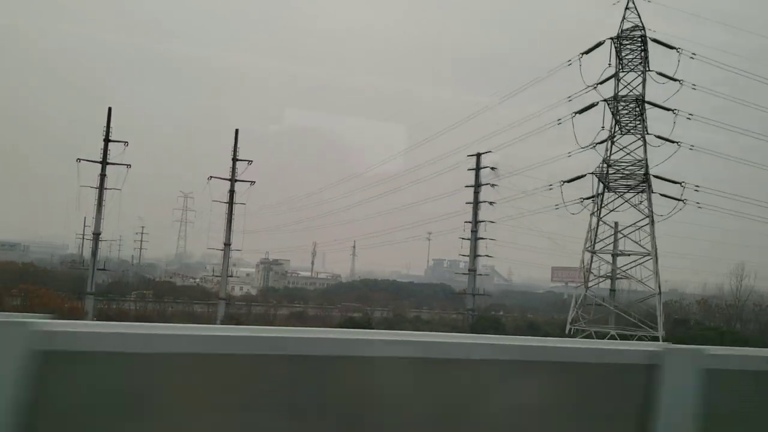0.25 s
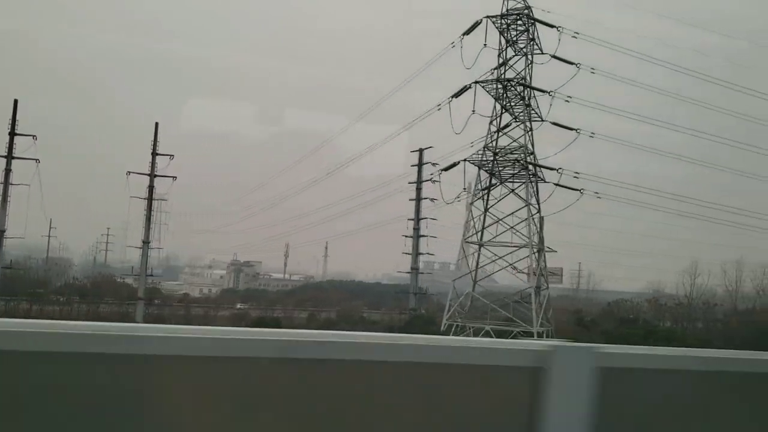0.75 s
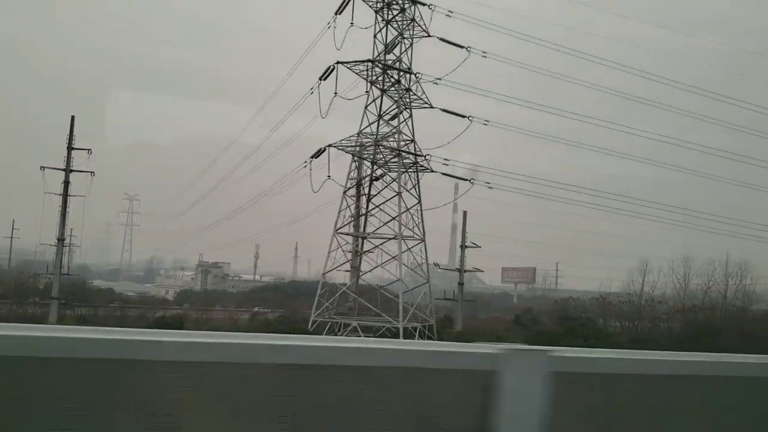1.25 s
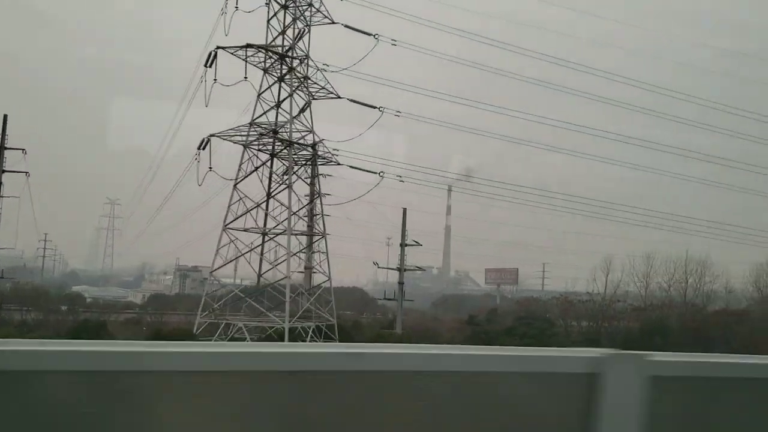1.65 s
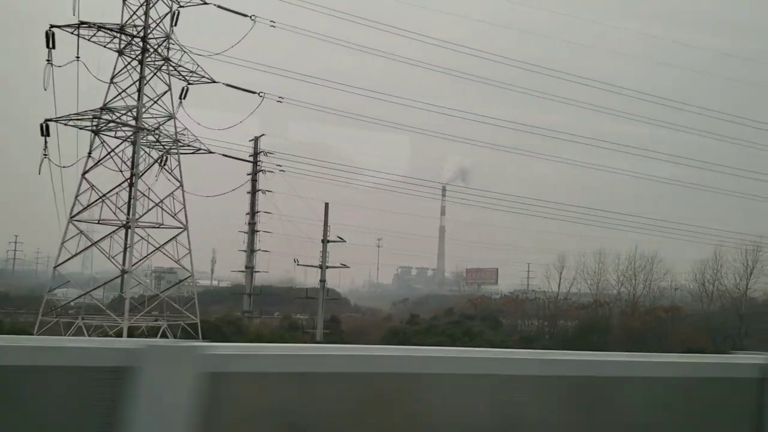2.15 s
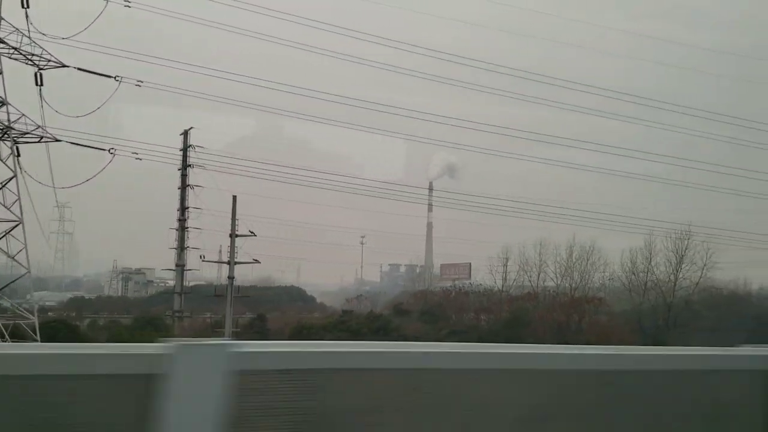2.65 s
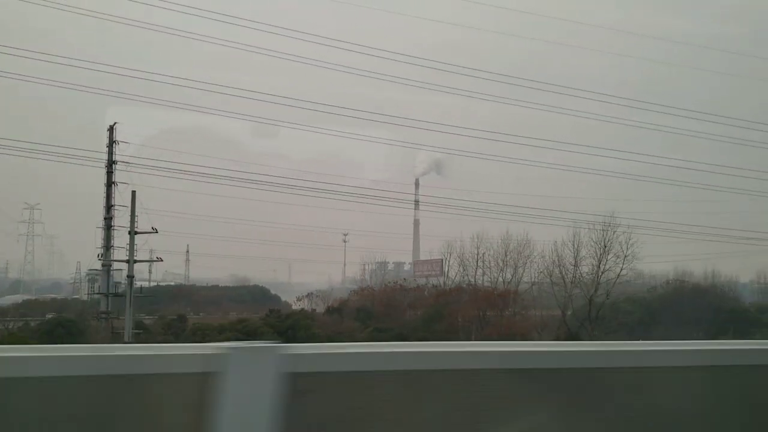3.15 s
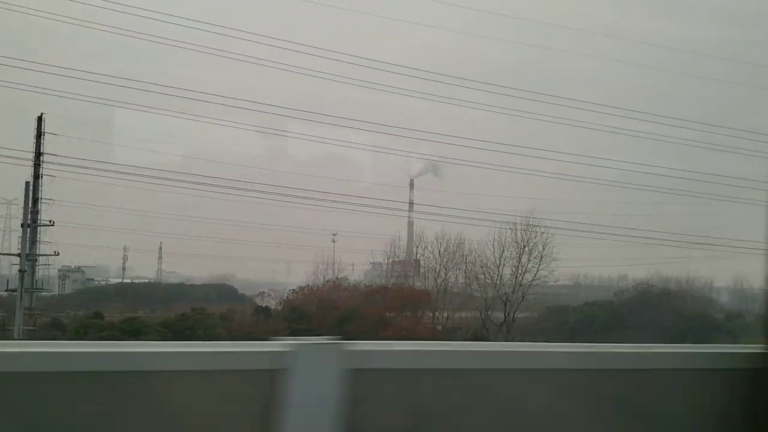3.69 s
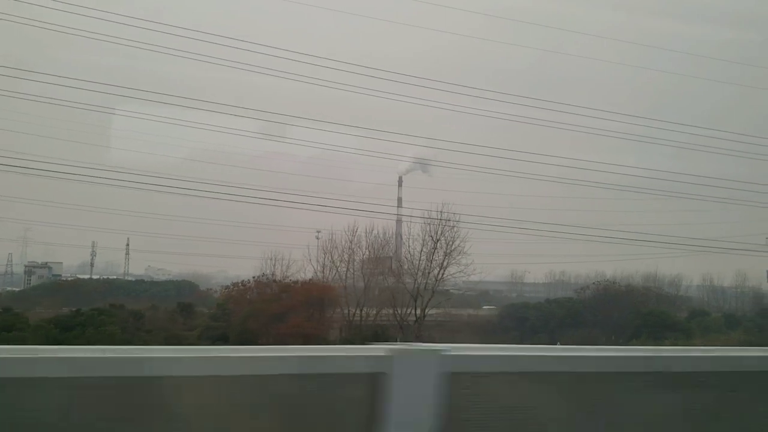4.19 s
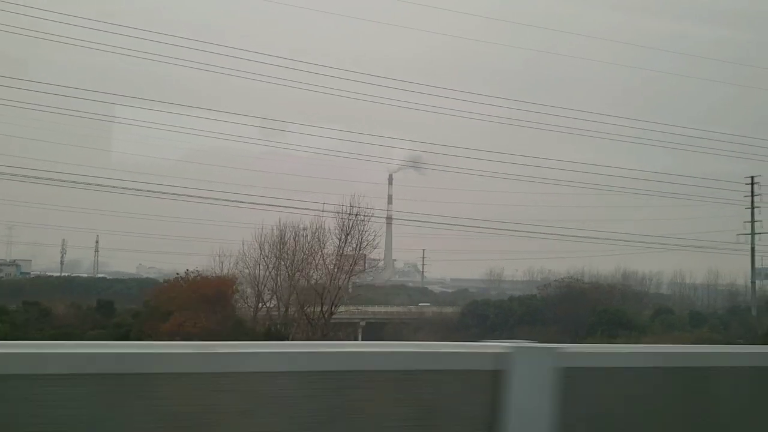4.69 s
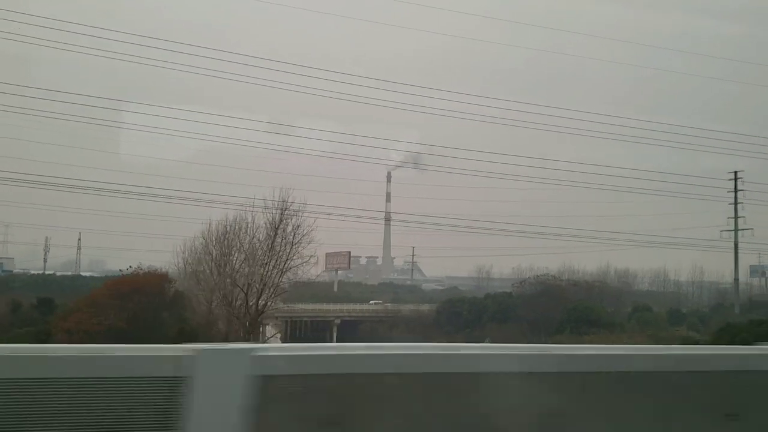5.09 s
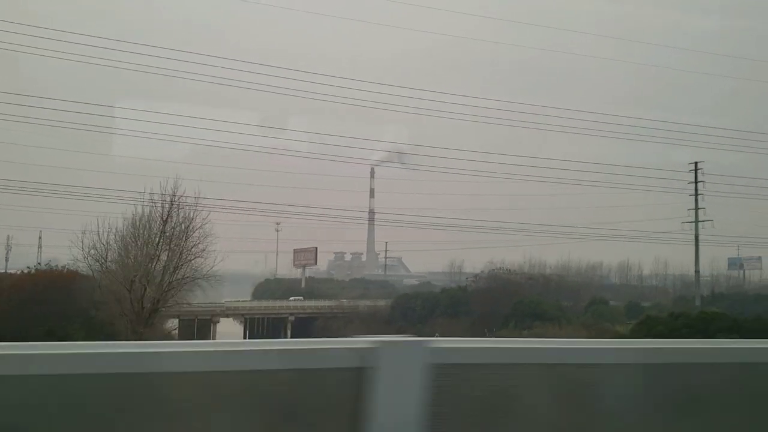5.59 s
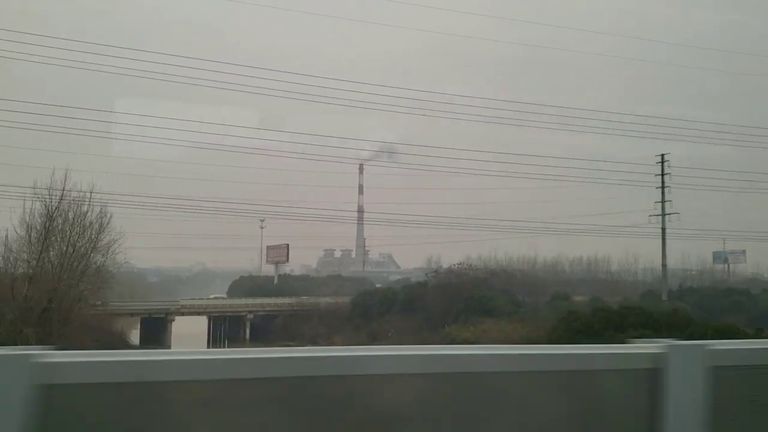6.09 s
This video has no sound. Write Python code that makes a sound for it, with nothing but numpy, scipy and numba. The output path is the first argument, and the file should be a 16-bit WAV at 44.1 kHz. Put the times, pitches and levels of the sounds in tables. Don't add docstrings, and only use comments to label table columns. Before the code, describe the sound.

Low rolling train rumble throbs unevenly under close fabric rustling, busiest around the middle, with a single dull thump on the window ledge.

```python
import sys
import numpy as np
from scipy import signal
from scipy.fft import rfft, irfft
from scipy.io import wavfile
from scipy.ndimage import uniform_filter1d
from numba import njit

SR = 44100
rng = np.random.default_rng(int(sys.argv[2]) if len(sys.argv) > 2 else 0)


def persist_wave(psi):
    counts = np.round(np.clip(psi, -1, 1) * 32767).astype(np.int16)
    wavfile.write(sys.argv[1], SR, np.atleast_2d(counts).T)


def field_ratio(decibels):
    return 10 ** (np.asarray(decibels, dtype=float) / 20)


N = 279594
T = np.arange(N) / SR

# start in seconds, peak level in dB, centre in Hz,
# bright part in dB.
SNAPS = [(0.855, -44, 6030, -16), (1.134, -43, 1710, -23), (1.4062, -41.5, 9000, -6),
         (2.4813, -40, 1520, -10), (2.5222, -42, 4610, -23), (2.5808, -26.5, 7300, -18),
         (2.7113, -37.5, 2080, -3), (2.765, -28.5, 5140, -5), (2.815, -33.5, 1770, -2),
         (2.855, -32.5, 7220, 1), (2.9143, -29, 4540, -3), (2.949, -44, 1980, -25), (3.018, -33.5, 2920, 3),
         (3.0616, -40, 3270, -17), (3.083, -37, 3310, -16), (3.25, -37, 2170, -7),
         (3.2798, -26.5, 3000, -17), (3.316, -24, 6760, -7), (3.359, -28, 4000, -2),
         (4.063, -37, 3400, -30), (3.915, -33, 3300, -40), (4.2926, -27.5, 4570, -3),
         (6.102, -40.5, 1900, -17), (4.58, -31, 6700, 3), (4.968, -41, 1520, -11), (4.9907, -34, 3500, -2),
         (5.4864, -37, 2000, -32), (5.8775, -38, 2400, -12), (5.992, -61, 5030, -20),
         (6.229, -56, 4000, -23)]
# start in seconds, peak level in dB, centre in Hz,
# bright part in dB, time to die away in seconds.
FOLDS = [(.07, -44, 3500, -8, 0.22), (.191, -38, 6540, -10, 0.27), (0.504, -33.5, 2800, -8.5, 0.32),
         (.8769, -40.5, 1920, -29, .14), (1.184, -31.5, 4500, -8, 0.15), (1.4433, -35.5, 7700, 0, 0.27),
         (2.199, -40, 2550, -30, .15), (2.498, -42, 5500, -9, .1), (3.1292, -32, 3340, -4, 0.18),
         (3.184, -26.5, 3300, -8, 0.084), (3.4412, -28, 2340, -9, 0.058), (3.5034, -29.5, 4430, -3, 0.11),
         (3.6147, -28.5, 7400, -3, 0.47), (3.868, -30, 5360, -2, 0.19), (3.9856, -31, 7830, -8, 0.17),
         (4.052, -27, 3050, -8, 0.094), (4.14, -30, 6100, 2, 0.13), (4.2178, -36, 2960, -12, 0.12),
         (4.354, -28.5, 2030, -18, 0.24), (4.4346, -31.5, 4200, -6, 0.12), (4.4712, -32, 1860, -8, .13),
         (4.621, -35.5, 3250, 0, 0.28), (5.598, -33.5, 6500, -11, 0.12), (5.7736, -40, 1530, -28, 0.22)]


def unit(x):
    return x / np.sqrt(np.mean(x ** 2))


def on_log(table, hz):
    f, v = np.transpose(table)
    return np.interp(np.log(np.maximum(hz, 1)), np.log(f), v)


def colour(x, table):
    hz = np.fft.rfftfreq(N, 1 / SR)
    return irfft(rfft(x) * field_ratio(on_log(table, hz)), N)


def walk(rate):
    hold = int(SR / rate)
    steps = np.repeat(rng.standard_normal(N // hold + 1), hold)
    drift = uniform_filter1d(uniform_filter1d(steps, hold), hold)[:N]
    return drift / drift.std()


def pan(db):
    return field_ratio(np.array([[db / 2], [-db / 2]]))


def car_body():
    # frequency in Hz, level in dB per Hz.
    body = [(24, -38), (32, -42), (44, -6), (58, 0.5), (70, -0.5), (88, -7), (114, 5.5), (132, -3.5),
            (155, -11), (220, -20.5), (361, -26), (600, -29.5), (726, -38.5), (900, -37)]
    # frequency in Hz, level in dB per Hz.
    rail = [(900, -37.5), (1030, -34.5), (1130, -38.5), (1250, -44.5), (1800, -47.5), (2700, -52),
            (3300, -65), (4000, -66)]
    # frequency in Hz, likeness from 0 to 1.
    likeness = [(60, 0.94), (130, 1), (290, 0.89), (640, 0.16), (1410, 0.2), (3100, 0.03), (6820, -0.0),
                (15000, 0.0)]
    # frequency in Hz, left minus right in dB.
    lean = [(40, 2), (120, 1.5), (300, 2.5), (700, 1.5), (1500, -0.5), (3000, 1)]
    bass_lag_s = 0.00023

    hz = np.fft.rfftfreq(N, 1 / SR)
    like = np.clip(on_log(likeness, hz), 0, 1)
    mid, side = rfft(rng.standard_normal((2, N)))
    shared, apart = np.sqrt(1 + like) * mid, np.sqrt(1 - like) * side
    both = np.array([shared + apart, shared - apart])
    tone_db = on_log(body[:-1] + rail, hz)
    both = both * field_ratio(tone_db + np.outer([.5, -.5], on_log(lean, hz)))
    both[0] *= np.exp(-2j * np.pi * hz * bass_lag_s)

    edges = (0, 88, 160, 700, 1250, 5000)
    steadiness = (0.66, 0.91, 0.12, 0.072, 0.039)
    out = 0
    for lo, hi, gain, even in zip(edges, edges[1:], shell_levels(), steadiness):
        band = irfft(both * (hz >= lo) * (hz < hi), N)
        swell = np.sqrt(uniform_filter1d(band.mean(0) ** 2, int(.07 * SR)) + 1e-12)
        band = band / swell ** even
        out = out + band / band.mean(0).std() * gain
    return out


def shell_levels():
    # middle in seconds, length in seconds, low boom in dB, floor boom in dB.
    jolts = [(0.035, 0.031, -29, -27.5), (0.138, 0.052, -32, -26), (0.235, 0.075, -27, -38),
             (0.361, 0.063, -24.5, -34), (0.54, 0.075, -24.5, -29.5), (0.707, 0.15, -28.5, -31.5),
             (0.946, 0.089, -27, -33.5), (1.11, 0.13, -32, -31.5), (1.275, 0.056, -28.5, -47),
             (1.463, 0.071, -44, -26.5), (1.598, 0.097, -30, -32), (1.754, 0.083, -44, -28.5),
             (1.998, 0.15, -30, -34), (2.233, 0.075, -37, -27), (2.414, 0.23, -32.5, -47),
             (2.627, 0.057, -37, -26), (2.81, 0.13, -38.5, -27.5), (2.957, 0.036, -23, -28),
             (3.057, 0.037, -28.5, -32), (3.27, 0.077, -22, -26.5), (3.443, .1, -44, -28.5),
             (3.686, 0.15, -32, -34), (3.83, 0.051, -29, -30.5), (4.133, 0.11, -26.5, -30),
             (4.596, 0.16, -34, -33), (4.92, 0.11, -36.5, -31), (5.21, 0.13, -28.5, -28),
             (5.447, 0.23, -31, -32), (5.716, 0.28, -30.5, -31), (6.23, .07, -27.5, -34.5)]
    # time in seconds, level in dB.
    rail_song = [(0, -58.5), (.41, -55.5), (1.02, -58), (2.0, -56.5), (3.1, -55), (3.4, -48), (3.6, -53),
                 (4.4, -54), (5.3, -58), (5.8, -55.5), (6.34, -56)]
    s, length, low_db, floor_db = np.array(jolts).T[:, :, None]
    swell = np.exp(-(2 * (T - s) / length) ** 2 / 2)

    def boom(calm_db, jolt_db):
        return np.sqrt(field_ratio(calm_db) ** 2 + (field_ratio(jolt_db) ** 2 * swell).sum(0))

    panels = field_ratio(-40.5 - 0.2255 * T)
    rail = field_ratio(np.interp(T, *np.transpose(rail_song)))
    vents = field_ratio(-63)
    return [boom(-38.5, low_db), boom(-35, floor_db), panels, rail, vents]


def tones():
    # frequency at 0 s in Hz, end in seconds, first level in dB,
    # last level in dB, left minus right in dB.
    geared = [
        (1045.3, 3.85, -63, -56, 0),
        (522.6, 2.4, -63, -59, 0),
        (360.5, 3.4, -55, -60, 3),
        (783, .85, -64, -67, 0),
    ]
    # frequency in Hz, start in seconds, level in dB, wobble in dB,
    # left minus right in dB.
    held = [
        (36.4, -1, -39.5, 1.2, 3),
        (59.8, -1, -35.5, 2.5, 5),
        (941.8, -1, -62, .8, 0),
        (920.5, 3.97, -59.5, .6, 0),
    ]
    speed = 1 - .01235 * T
    out = 0
    for hz, end, first_db, last_db, pan_db in geared:
        db = first_db + (last_db - first_db) * T / end
        out = out + line(hz * speed, db, end - T, 1.2, pan_db)
    for hz, start, db, wobble_db, pan_db in held:
        out = out + line(hz, db, T - start, wobble_db, pan_db)
    return out


def line(hz, db, on, wobble_db, pan_db):
    gain = np.clip(on / 0.031 + 1, 0, 1) * field_ratio(db + wobble_db * walk(6))
    wavering_hz = hz * (1 + 0.00052 * walk(3.99))
    sine = np.sqrt(2) * np.sin(2 * np.pi * np.cumsum(wavering_hz) / SR)
    return pan(pan_db) * gain * sine


def cloth():
    # time in seconds, effort in dB, fineness of the weave in dB.
    sliding = [(0, -76, -13), (.1, -59.5, 1), (.45, -71.5, 6), (.75, -67.5, 0.5), (1.06, -62, 3),
               (1.3, -67.5, 1.5), (1.8, -61.5, -2.5), (2.15, -61.5, 0.5), (2.4, -57, 0), (2.85, -51, 0),
               (3.02, -55, -1), (3.4, -43, 0), (3.75, -54.5, -2), (4.2, -54, -3), (4.6, -56, 0),
               (5.2, -60, -3.5), (5.85, -56.5, -1.5), (6.34, -59.5, -9)]
    s, effort_db, fine_db = np.transpose(sliding)
    effort = field_ratio(np.interp(T, s, effort_db)) ** 2
    slide_db = 10 * np.log10(effort + stir(0))
    sheen_db = 10 * np.log10(effort + stir(0.47))
    dull_db = slide_db + 0.25 * (slide_db + 47) + 5.0
    bright_db = sheen_db + 4.0
    noise = rfft(rng.standard_normal((2, N)))
    third = 3 * np.log2(np.fft.rfftfreq(N, 1 / SR) / 1000 + 1e-9)
    out = 0
    for k in range(14):
        bright = np.clip((k - 7) / 2, 0, 1)
        db = dull_db + bright * (bright_db - dull_db)
        db = db + max(k - 6, 0) / 4 * np.interp(T, s, fine_db)
        db = db + 1.4 * walk(12) + 1.1 * walk(35)
        patch = irfft(noise * np.clip(1 - abs(third - k), 0, 1), N)
        out = out + patch * field_ratio(db)
    return out * grain(200, 2.0)


def stir(bright_share):
    s, db, _, bright_db = np.array([r[:4] for r in SNAPS + FOLDS]).T[:, :, None]
    is_snap = (np.arange(len(s)) < len(SNAPS))[:, None]
    db = db + 0.5 * is_snap - 21.5
    late = T - s - 0.0055
    swell = np.exp(-(late / np.where(late < 0, 0.007, 0.017)) ** 2 / 2)
    return (field_ratio(db + bright_share * (bright_db + 5.5)) ** 2 * swell).sum(0)


def grain(rate, spread_db):
    hits = (rng.random(N) < rate / SR) * field_ratio(spread_db * rng.exponential(size=N))
    fading = signal.lfilter([1], [1, -np.exp(-1 / (0.0051 * SR))], hits)
    return unit(1 + 0.25 * fading)


def creases():
    # start in seconds, length in seconds, level in dB, centre in Hz,
    # width in octaves.
    rubs = [(0.169, 0.053, -54, 8000, 0.69), (0.491, 0.043, -54, 6000, 0.92),
            (6.004, 0.043, -64, 6800, 0.24), (0.836, 0.037, -64, 6140, .25), (0.944, 0.13, -59, 12000, 1.1),
            (1.116, 0.086, -57, 4130, 1.4), (1.175, 0.041, -55, 1490, 0.33),
            (1.656, 0.084, -64, 7900, 0.07), (1.986, 0.22, -60, 13600, 0.22),
            (2.216, 0.16, -56, 1910, 0.61), (2.242, 0.15, -60.5, 5130, 0.64),
            (3.152, 0.085, -59, 1790, 0.11), (3.268, 0.077, -47.5, 3980, 1.1),
            (4.571, 0.095, -56, 12200, 0.11), (4.781, 0.062, -56.5, 8100, 2.9),
            (5.805, 0.15, -64, 4800, .5), (1.734, 0.045, -62, 7900, 0.58), (2.576, 0.01, -38.5, 14000, .25),
            (0.874, .03, -65, 3480, 0.87), (5.872, .025, -71, 3500, 0.93), (5.93, .02, -60, 13500, .3),
            (6.021, 0.041, -71, 4330, .03), (4.462, 0.037, -40, 680, .06), (5.85, 0.062, -44.5, 697, 0.041)]
    size = 16384
    out, t = np.zeros((2, N + size)), np.arange(size) / SR
    octave = np.log2(np.fft.rfftfreq(size, 1 / SR) + 1)
    rows = [(*r, .12, .55) for r in SNAPS] + [(*r, .15) for r in FOLDS]
    for s, db, hz, bright_db, t60, snap in rows:
        peak = np.exp(-((octave - np.log2(hz)) / 0.68) ** 2)
        shape = peak + np.where(octave < 13.1, .3, 0.071 + 1.1 * field_ratio(bright_db))
        drag = (1 - np.exp(-t / (0.048 * t60 + 0.0012))) * np.exp(-np.log(1000) * t / t60)
        tick = (1 - np.exp(-t / .0004)) * np.exp(-t / .0035)
        fade = 1.67 * snap * tick + 0.56 * (1 - snap) * drag
        out[:, int(s * SR):][:, :size] += field_ratio(db - 3.0) * burst(shape, size) * fade
    for s, length, db, hz, width in rubs:
        shape = np.exp(-((octave - np.log2(hz)) / width) ** 2)
        swell = np.sin(np.pi * np.clip(t / length, 0, 1))
        out[:, int(s * SR):][:, :size] += field_ratio(db + 4.0) * burst(shape, size) * swell
    return out[:, :N] * grain(220, 2.16)


def burst(shape, size):
    steps = np.repeat(rng.standard_normal(len(shape) // 90 + 1), 90)[:len(shape)]
    ripple = uniform_filter1d(steps, size=60)
    return unit(irfft(rfft(rng.standard_normal((2, size))) * shape * field_ratio(2.2 * ripple)))


@njit
def svf(x, hz, q):
    y, b, l = np.empty(len(x)), 0., 0.
    for i in range(len(x)):
        g = np.tan(np.pi * hz[i] / SR)
        v = (b + g * (x[i] - l)) / (1 + g * (g + 1 / q[i]))
        b, l, y[i] = 2 * v - b, l + 2 * g * v, v / q[i]
    return y


def ports(x):
    # frequency in Hz, gain in dB.
    left_tone = [(1200, 2), (2500, -1), (3800, -1), (4600, -3.5), (6000, -5), (8000, -2), (9500, -9.5),
                 (11000, -6), (15500, -12.5)]
    # frequency in Hz, gain in dB.
    right_tone = [(1200, 1.5), (2500, 1.5), (5000, 3.5), (8000, 6.5), (10000, 4.5), (11800, 9), (13500, 3),
                  (15800, -1.5)]
    # time in seconds, centre in Hz, sharpness.
    notch = [
        (0, 6700, 4.8),
        (2.36, 6700, 4),
        (2.42, 8700, 1.86),
        (6.34, 9000, 1.9),
    ]
    s, hz, q = np.transpose(notch)
    right = x[1] - 0.71 * svf(x[1], np.interp(T, s, hz), np.interp(T, s, q))
    return np.array([colour(x[0], [(200, -48)] + left_tone), colour(right, [(200, -38)] + right_tone)])


def knock():
    start_s, ledge_hz, blow_db = 3.4063, 285, -9.5
    t = np.maximum(T - start_s, 0)
    turns = ledge_hz * t + 0.43 * (1 - np.exp(-t / .004))
    attack = (1 - np.exp(-t / 0.0014)) ** 2
    fade = attack * (0.92 * np.exp(-t / 0.002) + 0.067 * np.exp(-t / 0.017)) * 2
    ring = np.sin(2 * np.pi * turns) + 0.2 * np.sin(2 * np.pi * 560 * t)
    return -pan(2.8) * field_ratio(blow_db) * fade * ring


def air():
    return field_ratio(-60.5) * rng.standard_normal((2, N))


def scene():
    return car_body() + tones() + knock() + ports(cloth() + creases() + air())


def roll_off(x):
    return signal.sosfilt(signal.butter(12, 15910, fs=SR, output="sos"), x)


def record(dry):
    top = signal.ellip(10, .2, 60, 15780, fs=SR, output="sos")
    return roll_off(signal.sosfilt(top, dry))


dry = scene()
out = record(dry)
persist_wave(out)
```